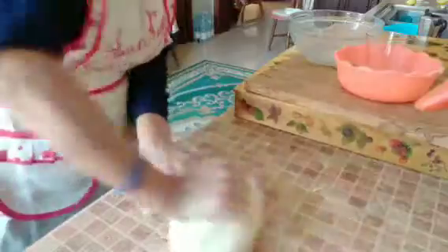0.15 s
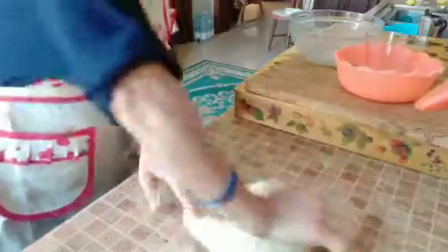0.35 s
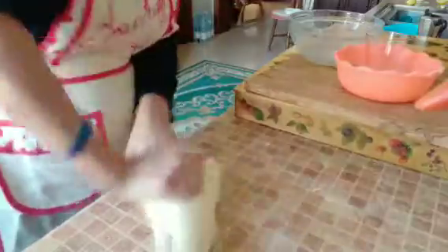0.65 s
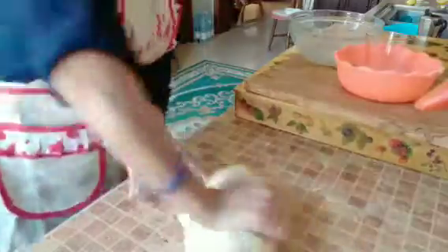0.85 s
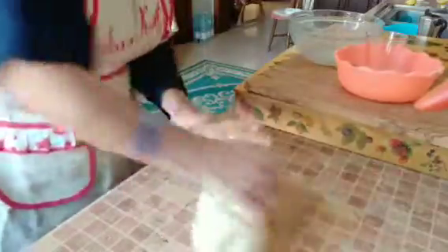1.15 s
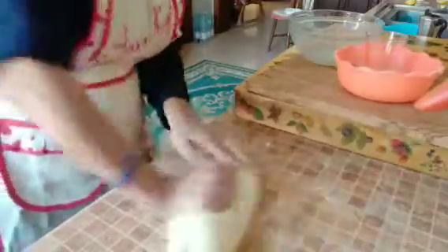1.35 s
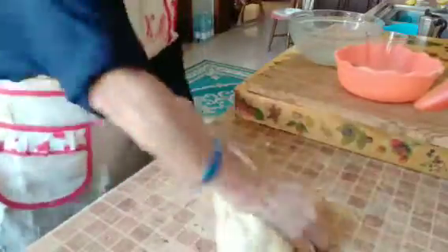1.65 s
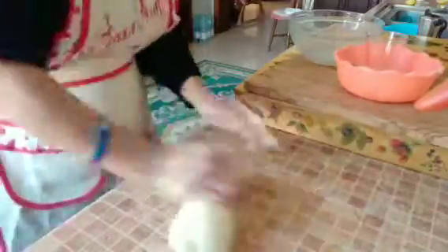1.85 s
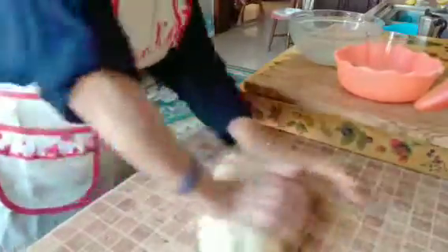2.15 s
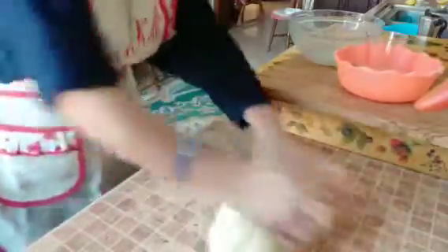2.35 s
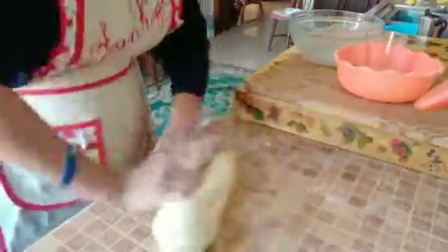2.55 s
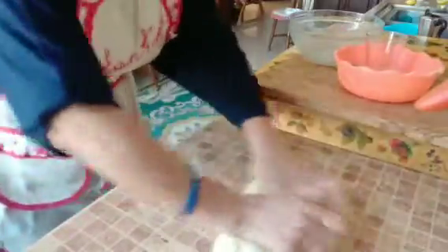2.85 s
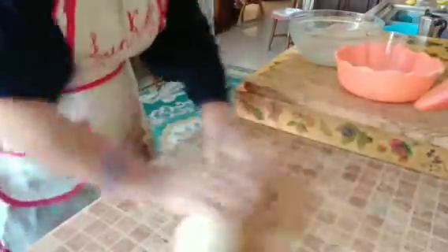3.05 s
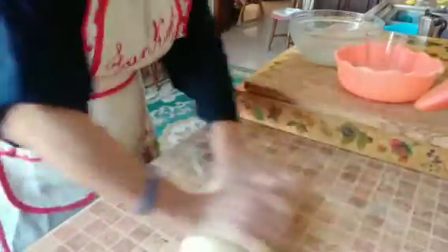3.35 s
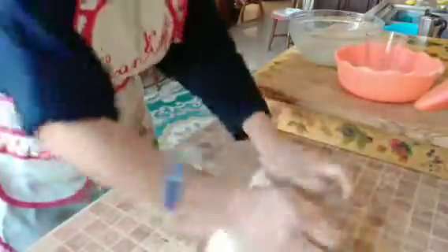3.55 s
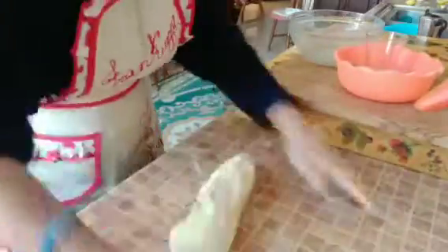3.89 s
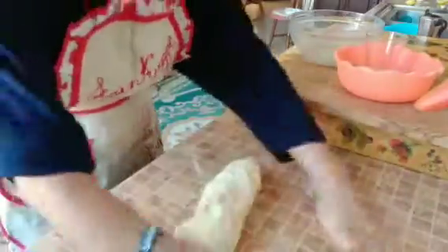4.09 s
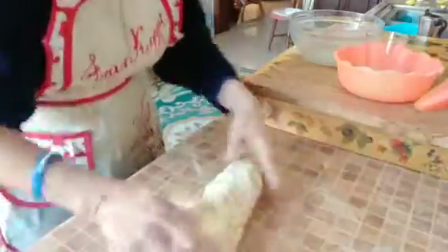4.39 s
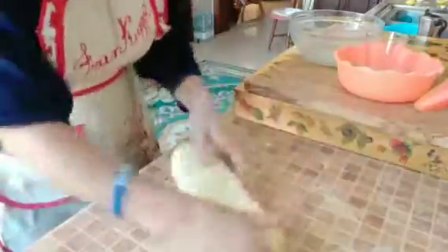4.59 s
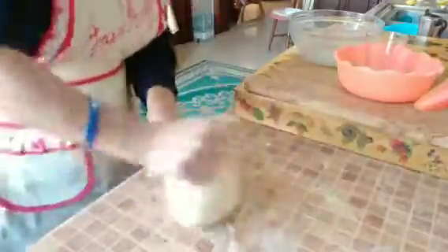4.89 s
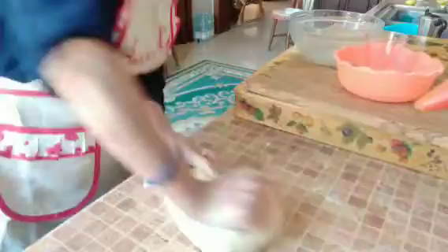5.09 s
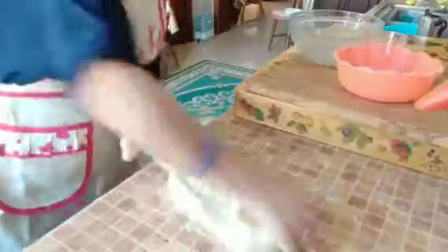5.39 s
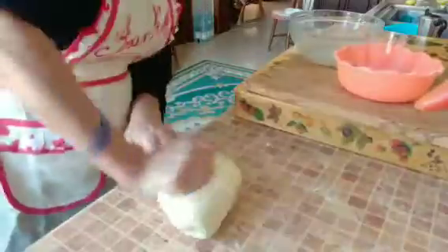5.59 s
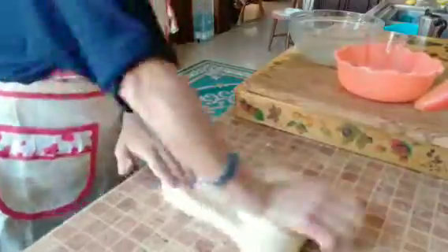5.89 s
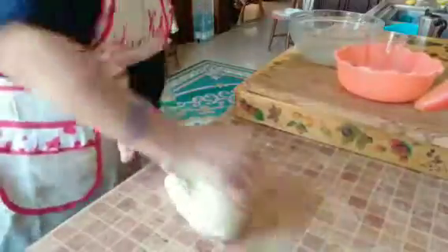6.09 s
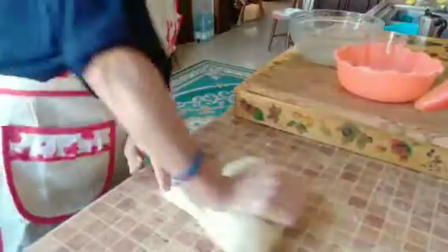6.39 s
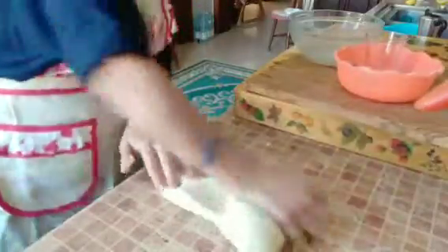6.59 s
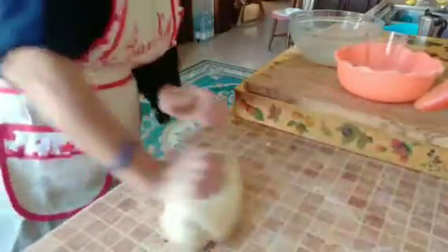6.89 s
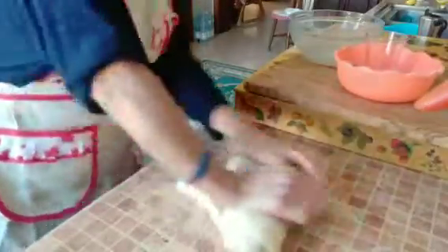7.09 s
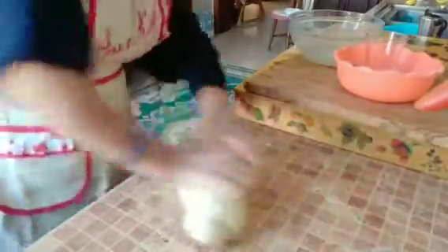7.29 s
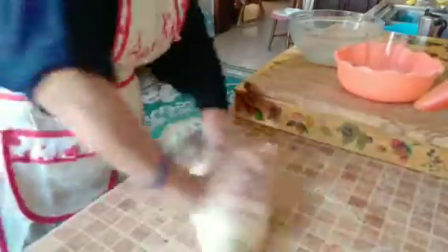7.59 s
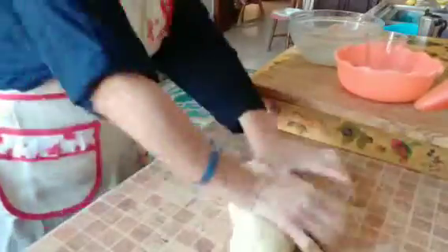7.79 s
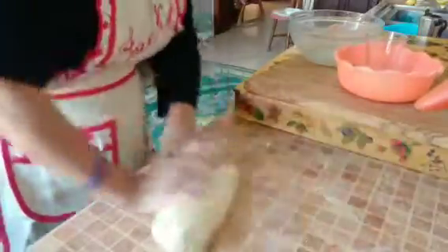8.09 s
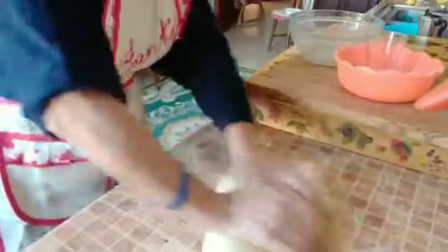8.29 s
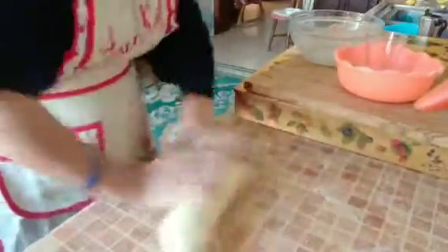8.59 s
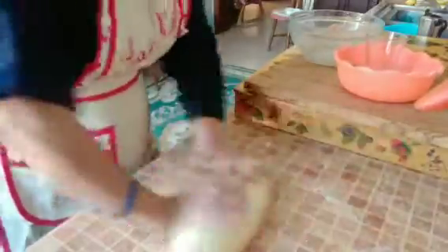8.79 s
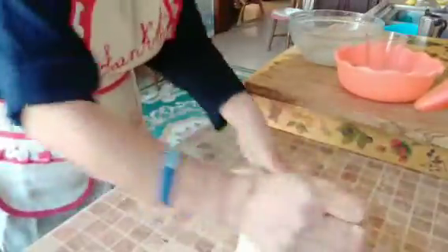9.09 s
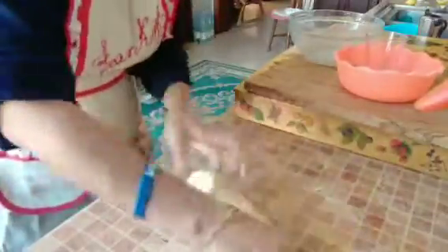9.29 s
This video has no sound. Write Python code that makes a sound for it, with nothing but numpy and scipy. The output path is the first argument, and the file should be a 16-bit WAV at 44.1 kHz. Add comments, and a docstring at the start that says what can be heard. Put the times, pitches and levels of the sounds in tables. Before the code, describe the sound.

Two hands knead bread dough on a tiled worktop, close to the microphone. Light folds alternate with heavier shoves, each with a hiss of skin on flour, and landings make dull thuds, sometimes with a smack of the palm. Something small and hard clicks once early on. Near the middle a hand sweeps across the tiles and the dough skids briefly three times. An appliance hums low in the quiet kitchen.

```python
"""Soft thuds and a floury hiss, close by: two hands knead bread dough on a tiled worktop.
Light folds and heavy shoves take turns. Palms and dough hiss as they rub over the flour, and each
landing makes the worktop and its cabinet ring with a thud, sometimes with a smack of skin.
Something small and hard clicks once, one hand sweeps across the tiles, and the dough judders in
three short skids. Behind it all, an appliance hums low in the quiet kitchen."""
import sys
import numpy as np
from scipy import signal
from scipy.fft import rfft, irfft
from scipy.io import wavfile
from scipy.ndimage import uniform_filter1d

SR = 44100
rng = np.random.default_rng(int(sys.argv[2]) if len(sys.argv) > 2 else 0)


def generate_wav(sig):
    """Save sig (samples, or channels by samples) to the path in sys.argv[1] as 16-bit PCM at SR."""
    pcm = np.round(np.clip(np.atleast_2d(sig).T, -1, 1) * 32767).astype(np.int16)
    wavfile.write(sys.argv[1], SR, pcm)


N = 416744


def gain_of(db):
    """Turns decibels into a number to multiply by."""
    return 10 ** (np.asarray(db) / 20)


def unit_level(x):
    """Scales a signal to an average (rms) level of 1."""
    return x / np.sqrt(np.mean(x ** 2) + 1e-20)


def value_at(table, hz):
    """Looks up a frequency in a table, sliding smoothly between the rows."""
    table_hz, value = np.transpose(table)
    return np.interp(np.log(hz + 1), np.log(table_hz + 1), value)


def add(mix, start, sound):
    """Adds a sound to the mix at a start time in seconds."""
    part = mix[..., max(round(start * SR), 0):][..., :sound.shape[-1]]
    part += sound[..., :part.shape[-1]]


def frequencies(x):
    """Lists the frequencies that make up a signal."""
    return np.fft.rfftfreq(x.shape[-1], 1 / SR)


def shape_tone(x, tone):
    """Turns each frequency up or down as a tone table says."""
    return irfft(rfft(x) * gain_of(value_at(tone, frequencies(x))), x.shape[-1])


def wander(hz):
    """A random wobble, up to about hz times a second."""
    noise = rng.standard_normal(N)
    return unit_level(irfft(rfft(noise) / (1 + (frequencies(noise) / hz) ** 4), N))


def grains(per_s, spread_db):
    """Tiny slips of uneven size at random moments."""
    size = gain_of(spread_db * np.minimum(rng.exponential(1, N), 4))
    return unit_level(size * rng.standard_normal(N) * (rng.random(N) < per_s / SR))


# How alike left and right sound: (frequency [Hz], likeness [0 to 1])
LIKENESS = [(50, 0.96), (130, 1), (300, 0.66), (600, 0.91), (1200, 0.095), (4000, 0.16), (16000, 0.24)]
def blend_sides(x):
    """Makes two unrelated channels alike in the bass, as two close microphones hear them."""
    left, other = rfft(x)
    likeness = np.clip(value_at(LIKENESS, frequencies(x)), -1, 1)
    right = likeness * left + np.sqrt(1 - likeness ** 2) * other
    return irfft(np.array([left, right]), x.shape[-1])


# The tone of the quiet room: (frequency [Hz], relative level [dB])
AIR_TONE = [(10, -19), (25, -1.5), (42, -4.5), (65, -9.5), (115, -5.5), (190, -26.5), (270, -21.5),
            (490, -34), (590, -26), (800, -35), (1500, -36.5), (4300, -39.5), (7900, -37.5), (16000, -39)]
def room_air(treble_db=-66):
    """Steady room air and microphone hiss; the part above 1000 Hz sets the level."""
    air = shape_tone(blend_sides(rng.standard_normal((2, N))), AIR_TONE)
    treble = signal.sosfilt(signal.butter(4, 1000, "high", fs=SR, output="sos"), air.mean(0))
    return gain_of(treble_db) * air / treble.std()


def appliance_hum(pitch_hz=48.3, level_db=-50.5):
    """An appliance hums one low note that wavers a little in pitch and loudness."""
    cycles = np.cumsum(pitch_hz + .4 * wander(hz=3)) / SR
    loudness = 1 + .08 * wander(hz=4)
    return gain_of(level_db) * unit_level(np.sin(2 * np.pi * cycles) * loudness)


# How long the kitchen rings: (frequency [Hz], time to fade by 60 dB [s])
ECHO_FADES = [(100, 0.69), (500, 0.13), (4000, 0.18), (14000, 0.16)]
def kitchen_echo(x, build_s=0.02):
    """The room answers with a blur of echoes, in which the bass lasts longest."""
    hz, t, bands = signal.stft(blend_sides(rng.standard_normal((2, SR // 2))), SR, nperseg=256)
    fade = gain_of(-60 * t / value_at(ECHO_FADES, hz)[:, None])
    tail = signal.istft(bands * fade, SR, nperseg=256)[1]
    tail *= np.minimum(np.arange(tail.shape[1]) / SR / build_s, 1)
    return signal.fftconvolve(x[None], tail / np.linalg.norm(tail[0]), axes=1)[:, :N]


# The bright tone of the click: (frequency [Hz], relative level [dB])
CLICK_TONE = [(500, -14), (1500, -22), (2300, -24), (3300, -6.5), (4500, -15), (6200, -8), (7500, -2),
              (9000, 1), (11000, -1), (13000, -3), (16000, -14)]
# The one click: (time [s], peak level [dB])
CLICK_TIMES = [(2.6119, -12)]
def hard_click(scuff_db=-21, scuff_s=0.0019, splash_db=-17, splash_s=0.0052, wall_db=-21, wall_s=.0195):
    """A brief scuff, a hard snap, its quick splash off the tiles, and one echo from a wall."""
    out, t = np.zeros((2, N)), np.arange(-256, 1792) / SR
    scuff = gain_of(scuff_db) * np.exp(-abs(t) / scuff_s)
    splash = gain_of(splash_db) * np.exp(-abs(t) / splash_s)
    for time, db in CLICK_TIMES:
        noise = np.where(t < 0, scuff, splash) * rng.standard_normal((2, len(t)))
        snap = shape_tone((t == 0) + noise, CLICK_TONE)  # a single spike at t = 0
        snap *= gain_of(db) / abs(snap.mean(0)).max()
        add(out, time + t[0], snap)
        add(out, time + t[0] + wall_s, gain_of(wall_db) * snap[::-1])  # left and right swap
    return out


# Short skids: (time [s], length [s], level [dB], pitch [Hz], pitch spread [octaves])
DOUGH_SKIDS = [(3.99, 0.066, -42, 620, 1.75), (4.476, 0.11, -46, 124, 0.3), (5.366, 0.033, -51, 1240, 0.95)]
def dough_skids():
    """Dough sticks and slips on the tiles in a quick, uneven judder."""
    out = np.zeros((2, N))
    slips = blend_sides(np.array([grains(per_s=1500, spread_db=-1.5) for _ in range(2)]))
    for start, length, db, hz, octaves in DOUGH_SKIDS:
        band = signal.butter(2, hz * 2 ** (octaves * np.array([-.5, .5])), "band", fs=SR, output="sos")
        judder = signal.sosfilt(band, slips)[:, int(start * SR):][:, :int(length * SR)]
        soft_ends = signal.windows.tukey(judder.shape[1], .5)
        add(out, start, gain_of(db) * unit_level(judder) * soft_ends)
    return out


# The tone of a smack: (frequency [Hz], relative level [dB])
SMACK_TONE = [(300, -51), (1200, -33), (2400, -7), (3500, -5), (5000, -5.5), (7200, 1.5), (10000, -12),
              (16000, -4)]
# Skin smacking the dough: (time [s], peak level [dB], time to fade to about a third [ms])
PALM_SMACKS = [(0.441, -45, 9), (0.453, -50, 6), (1.020, -38.5, 6.4), (2.295, -44, 16), (3.651, -34.5, 14),
               (4.435, -39, 11), (5.38, -41, 19), (7.904, -41, 7.9), (8.95, -35.5, 11), (9.264, -37.5, 14)]
def palm_smacks():
    """Air and flour spurt from under a landing palm."""
    out, t = np.zeros((2, N)), np.arange(SR // 20) / SR
    for start, db, fade_ms in PALM_SMACKS:
        spurt = shape_tone(rng.standard_normal((2, len(t))), SMACK_TONE) * np.exp(-1000 * t / fade_ms)
        add(out, start, gain_of(db) * spurt / abs(spurt.mean(0)).max())
    return out


# Points along the sweep: (time [s], relative hiss level [dB], relative drag level [dB])
HAND_SWEEP = [(3.93, -79, -76), (3.954, -58.5, -58), (3.986, -49.5, -55), (4.002, -42.5, -46),
              (4.018, -39, -45.5), (4.104, -43, -53), (4.15, -38.5, -51.5), (4.218, -43, -57),
              (4.28, -69, -65)]
def hand_sweep(hiss_db=0.5, drag_db=-2.5):
    """How strong the hiss and the lower drag noise are as one hand sweeps over the tiles."""
    times, hiss, drag = np.transpose(HAND_SWEEP)
    t = np.arange(N) / SR
    return gain_of([np.interp(t, times, db, -np.inf, -np.inf) for db in (hiss + hiss_db, drag + drag_db)])


# Folds, with relative levels: (time [s], length [s], hiss [dB], drag [dB], rise from start to end [dB])
LIGHT_FOLDS = [(0.0, 0.1, -65, -85, 5), (0.236, 0.12, -61, -65, 5), (0.716, 0.24, -60.5, -71, 8),
               (1.13, 0.13, -67, -66, -15), (1.32, 0.27, -63, -68, 0), (2.029, 0.232, -59.5, -64.5, 0),
               (2.59, 0.32, -57, -66, 14), (3.247, 0.3, -58.5, -62, 3.5), (4.714, 0.19, -75, -69, 8),
               (5.023, 0.37, -61.5, -67.5, 4), (5.649, 0.26, -61, -72, 8), (6.23, 0.38, -65, -71, -4),
               (6.871, 0.29, -61.5, -68, 5), (7.475, 0.32, -55, -67, -8), (8.108, 0.28, -61, -69, 9),
               (8.703, 0.24, -60.5, -66, -4), (9.073, 0.29, -64.5, -67.5, 7)]
def fold_power(fade_in_s=0.045, fade_out_s=0.024, rumble_above_drag_db=11.5):
    """The power of hiss, drag and rumble as light folds draw the dough back."""
    power, t = np.zeros((3, N)), np.arange(SR) / SR
    for start, length, hiss_db, drag_db, rise_db in LIGHT_FOLDS:
        motion = np.minimum(t / fade_in_s, 1) * np.exp(-np.maximum(t - length, 0) / fade_out_s)
        motion *= gain_of(rise_db * (np.minimum(t / length, 1) - .5))
        levels = gain_of([hiss_db, drag_db, drag_db + rumble_above_drag_db])
        add(power, start, np.outer(levels, motion) ** 2)
    return power


# Shoves, with relative levels: (time [s], length [s], hiss [dB], drag [dB], rumble [dB])
HEAVY_SHOVES = [(0.434, 0.088, -47.5, -57.5, -38.5), (0.508, 0.17, -61, -59.5, -52),
                (0.993, 0.14, -54.5, -58.5, -55), (1.605, 0.19, -56.5, -63.5, -57),
                (1.775, 0.12, -58, -58, -45), (2.27, 0.11, -55, -63.5, -67),
                (2.359, 0.16, -60.5, -60.5, -49.5), (2.995, 0.12, -57.5, -55.5, -48),
                (3.096, 0.12, -61.5, -59, -62), (3.63, 0.16, -58.5, -64, -46),
                (4.382, 0.11, -59, -60.5, -49), (4.509, 0.19, -51, -58, -57),
                (5.24, 0.037, -59.5, -61, -50), (5.361, 0.074, -50, -53.5, -45),
                (5.409, 0.16, -53.5, -56.5, -47), (5.946, 0.14, -53.5, -57.5, -45.5),
                (6.065, 0.14, -57, -61.5, -47), (6.53, 0.28, -58, -55.5, -43.5),
                (6.634, 0.15, -52.5, -70, -65), (7.239, 0.11, -54.5, -54.5, -45.5),
                (7.843, 0.15, -57.5, -60, -45.5), (8.486, 0.14, -53.5, -55.5, -40),
                (8.94, 0.16, -52, -58.5, -46.5), (9.35, 0.11, -59, -57.5, -57)]
def shove_power(ends_db=-10, top_flatness=2.77):
    """The power of hiss, drag and rumble swells and falls as the heel of the hand shoves the dough."""
    power, t = np.zeros((3, N)), np.arange(SR) / SR
    for start, length, *levels_db in HEAVY_SHOVES:
        from_middle = abs(t[t < 2 * length] - length) / (length / 2)
        motion = gain_of(ends_db * from_middle ** top_flatness)
        add(power, start - length / 2, np.outer(gain_of(levels_db), motion) ** 2)
    return power


def hand_strokes(rustle_db=-73):
    """Joins all hand movements into three strength curves: hiss, drag and rumble."""
    power = fold_power() + shove_power()
    power[:2] += hand_sweep() ** 2 + gain_of(rustle_db) ** 2  # the hands never lie quite still
    return np.sqrt(power)


def shifting_touch(x, depth_db=2.5):
    """The patch of skin that touches keeps changing, and so does the tone of its hiss."""
    bands = signal.stft(x, nperseg=512)[2]
    patches = uniform_filter1d(rng.standard_normal(bands.shape[1:]), size=11, axis=0)  # smooth in pitch
    patches = uniform_filter1d(patches, size=9, axis=1)  # and in time
    return signal.istft(bands * gain_of(depth_db * unit_level(patches)), nperseg=512)[1][:, :N]


# The bright hiss of skin on flour: (frequency [Hz], relative level [dB])
HISS_TONE = [(700, -47), (1500, -17.5), (2500, -18), (3300, -13.5), (5000, -9.5), (6300, -6), (7500, -3),
             (9000, -5.5), (10500, -8), (12000, -10.5), (14000, -12.5), (16000, -15.5)]
# The dull drag of the dough's weight: (frequency [Hz], relative level [dB])
DRAG_TONE = [(150, -6.5), (290, -2), (480, -4), (620, -2), (900, -4), (1300, -8), (1800, -11.5),
             (2600, -11.5), (5000, -20)]
def floury_rubbing(hiss_strength, drag_strength, boost_db=2.0, flutter_db=0.84, grit_share=0.3):
    """Flour grains roll under skin and dough; the grip flutters as the hand moves."""
    grit = np.array([grains(per_s=2500, spread_db=2.5) for _ in range(2)])
    smooth = rng.standard_normal((2, N))
    friction = shifting_touch(np.sqrt(grit_share) * grit + np.sqrt(1 - grit_share) * smooth)
    hiss = hiss_strength * unit_level(shape_tone(friction, HISS_TONE))
    drag = drag_strength * unit_level(shape_tone(blend_sides(friction), DRAG_TONE))
    return (hiss + drag) * gain_of(boost_db + flutter_db * wander(hz=41))


# Notes of the worktop and cabinet: (pitch [Hz], relative level [dB], time to fade by 60 dB [s])
WORKTOP_NOTES = [(94, -8, 0.084), (114, -0.5, 0.098), (159.7, -17, 0.52), (192, -14.5, 0.16),
                 (291, 1, 0.075), (353, -10, 0.11), (413, 1.5, 0.054), (563, -10, 0.1), (609, -1, 0.057),
                 (667, -21, 0.046), (786, -4.5, 0.041), (780, -32, 0.027), (1035, -12.5, 0.13),
                 (1400, -19, 0.046)]
def worktop_ring(uneven_db=2.5):
    """A struck worktop rings with many notes at once; each spot favours different ones."""
    t = np.arange(SR // 2) / SR
    hz, db, fade_s = np.transpose(WORKTOP_NOTES)[:, :, None]
    spot_db = -uneven_db * rng.standard_normal(hz.shape)
    return -(gain_of(db + spot_db - 60 * t / fade_s) * np.sin(2 * np.pi * hz * t)).sum(0)


def dough_rumble(strength, level_db=-3.0, soften_above_hz=120):
    """Squashed dough gives way in many small lurches that rumble in the worktop."""
    lurches = grains(per_s=260, spread_db=0.1)
    force = signal.sosfilt(signal.butter(1, soften_above_hz, fs=SR, output="sos"), lurches)
    return strength * gain_of(level_db) * unit_level(signal.oaconvolve(force, worktop_ring())[:N])


# Dough and hands landing on the worktop: (time [s], peak level [dB], contact time [ms])
LANDINGS = [(0.099, -37.5, 4.2), (0.301, -39.5, 5.3), (0.4516, -26.5, 2.4), (0.4583, -27, 2.7),
            (0.577, -35, 3.6), (1.019, -20.5, 1.5), (1.086, -31.5, 3.4), (1.211, -40, 8.8),
            (1.801, -33.5, 12), (2.303, -42, 0.82), (2.421, -39, 3.4), (2.602, -35, 12.4), (2.907, -36, 13),
            (3.142, -29, 14), (3.18, -27.5, 8.8), (3.658, -28.5, 1.2), (3.957, -24.5, 19),
            (4.435, -32, 1.4), (4.443, -25.5, 10), (4.692, -33, 7.4), (4.954, -42.5, 3.9),
            (5.265, -32.5, 7.6), (5.345, -26.5, 3.1), (5.43, -24.5, 5.2), (5.96, -33.5, 4.7),
            (6.055, -27.5, 9.9), (6.562, -17, 1.26), (6.811, -31, 17), (7.29, -27.5, 6.6),
            (7.375, -32.5, 10.2), (7.905, -32.5, 3.2), (8.528, -31, 10), (8.942, -33.5, 2.6),
            (9.004, -31, 1.7), (9.259, -26, 1.7), (9.273, -18.5, 3)]
def landing_thuds():
    """Each landing is a smooth push on the worktop: the longer it lasts, the duller the thud."""
    out, t = np.zeros(N), np.arange(-SR // 50, SR // 50) / SR
    for time, db, contact_ms in LANDINGS:
        force = 1 / np.cosh(2 * np.pi * t / (contact_ms / 1000)) ** 2
        thud = signal.fftconvolve(force, worktop_ring())
        add(out, time + t[0], gain_of(db) * thud / abs(thud).max())
    return out


def scene(thud_echo_db=-14, snap_echo_db=-15):
    """Thuds, rubbing and smacks on the worktop, with the room around them."""
    hiss, drag, rumble = hand_strokes()
    thuds = landing_thuds() + dough_rumble(rumble)
    snaps = hard_click() + palm_smacks()
    echo = kitchen_echo(gain_of(thud_echo_db) * thuds + gain_of(snap_echo_db) * snaps[0])
    # the deepest bass of the thuds and their echo is cut
    airborne = signal.sosfilt(signal.butter(2, 68, "high", fs=SR, output="sos"), thuds + echo)
    return airborne + snaps + floury_rubbing(hiss, drag) + dough_skids() + room_air() + appliance_hum()


# Which side is louder: (frequency [Hz], left minus right [dB])
SIDE_BALANCE = [(100, -0.2), (400, -0.5), (1300, 1), (3000, -1.5), (5500, -1.5), (7400, -7), (9000, -4),
                (10500, 2.3), (13000, -0.5), (15500, 1)]
def record(dry, left_late_s=.00025, top_hz=15850):
    """The left microphone is a little farther off, the right is brighter; the highest treble is cut."""
    hz = frequencies(dry)
    balance_db = value_at(SIDE_BALANCE, hz) * np.array([[.5], [-.5]])
    delay = np.exp(-2j * np.pi * hz * np.array([[left_late_s], [0]]))
    heard = irfft(rfft(dry) * gain_of(balance_db) * delay, N)
    treble_cut = signal.firwin(511, top_hz, window=("kaiser", 9), fs=SR)
    return signal.oaconvolve(heard, treble_cut[None], "same")


dry = scene()
out = record(dry)
generate_wav(out)
```